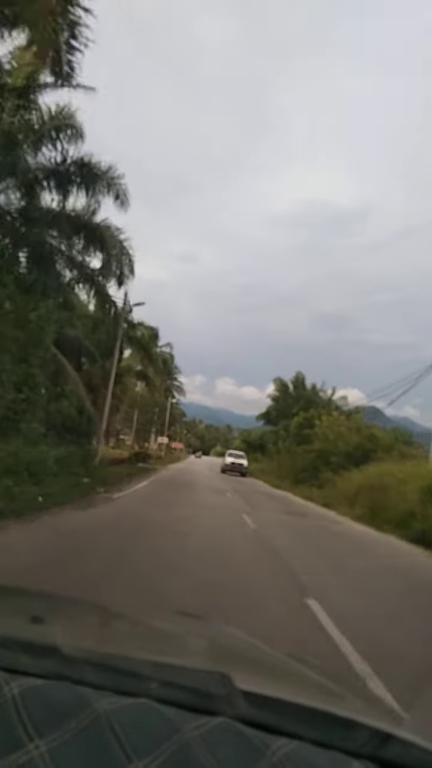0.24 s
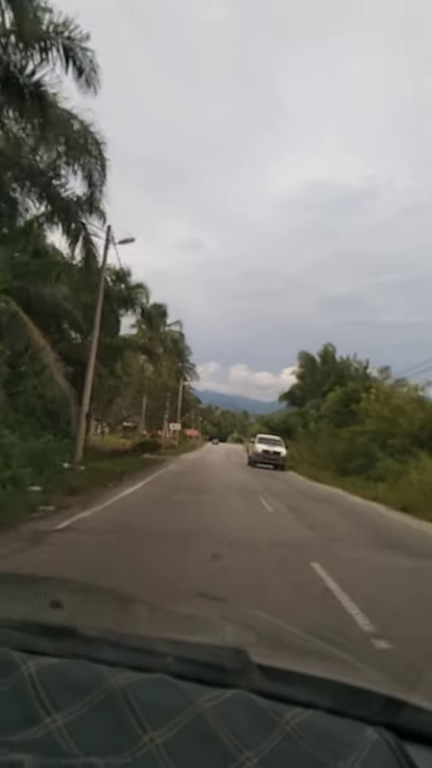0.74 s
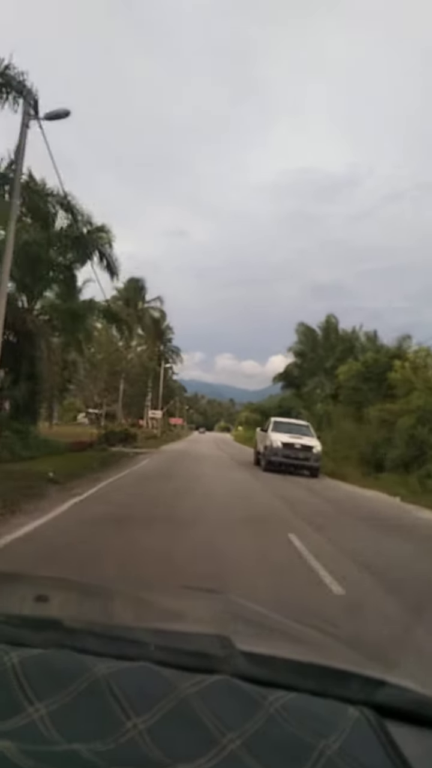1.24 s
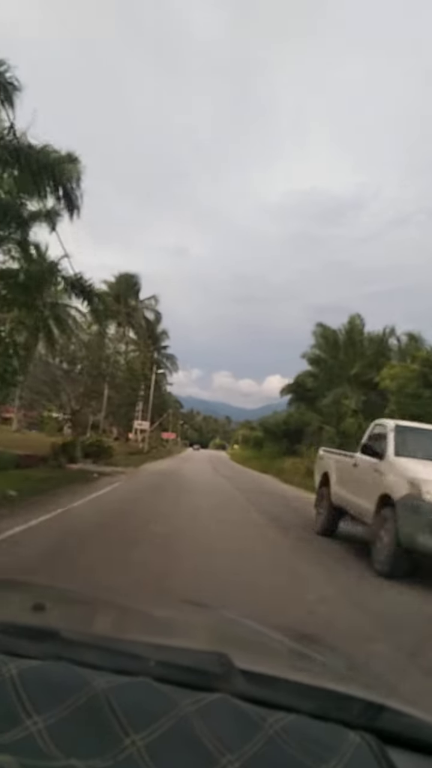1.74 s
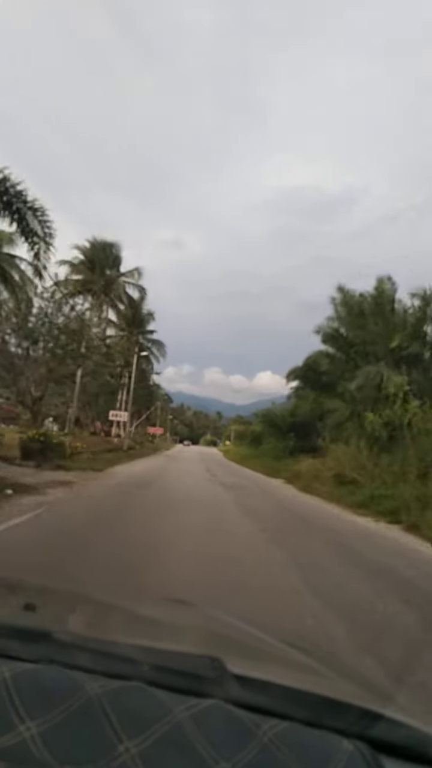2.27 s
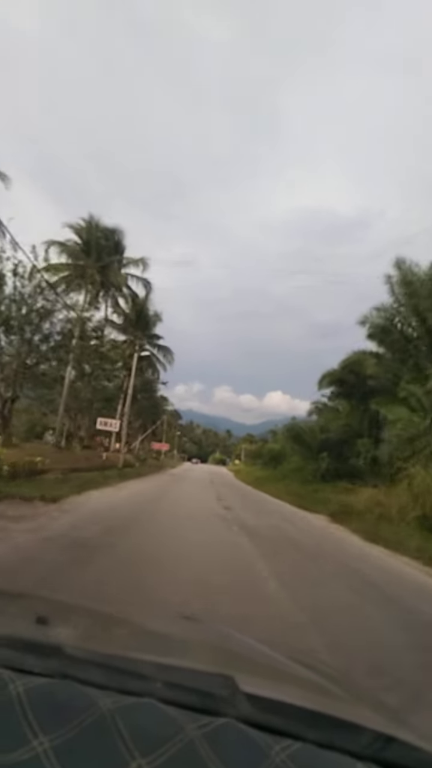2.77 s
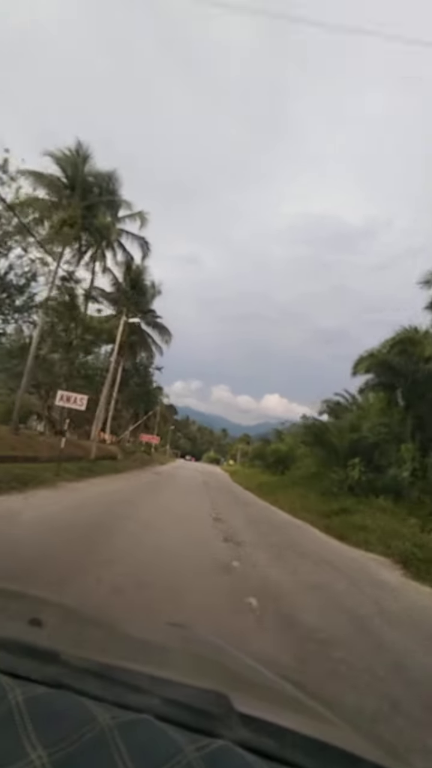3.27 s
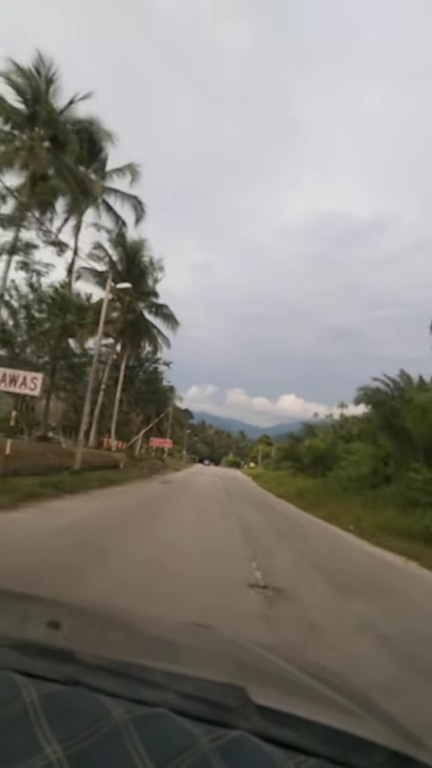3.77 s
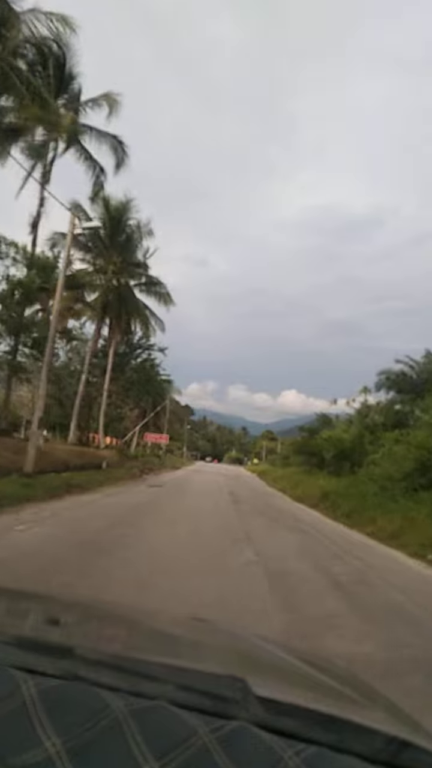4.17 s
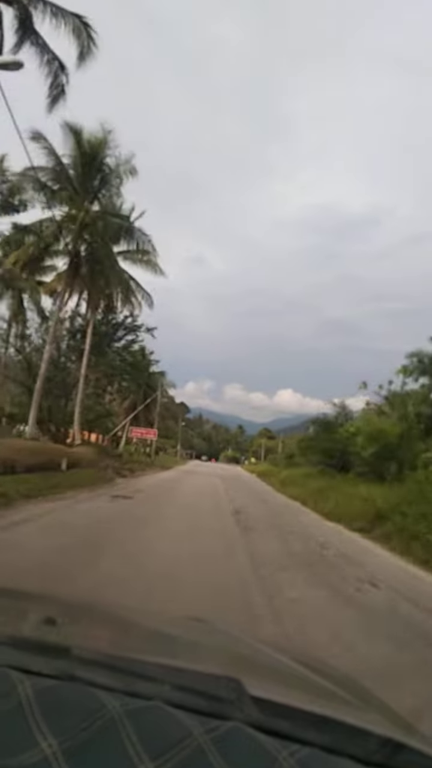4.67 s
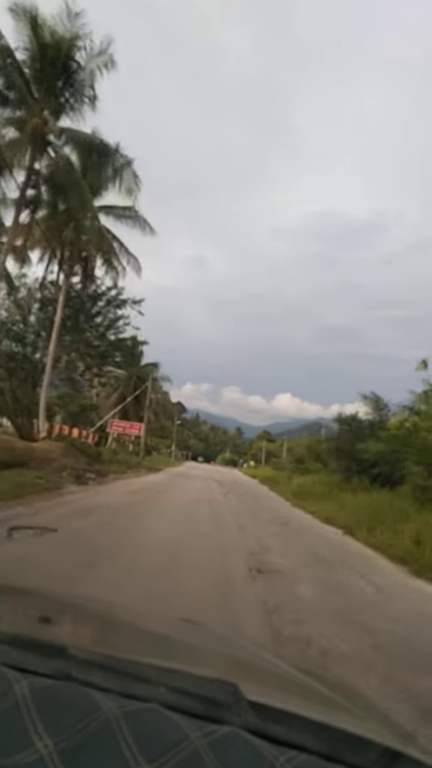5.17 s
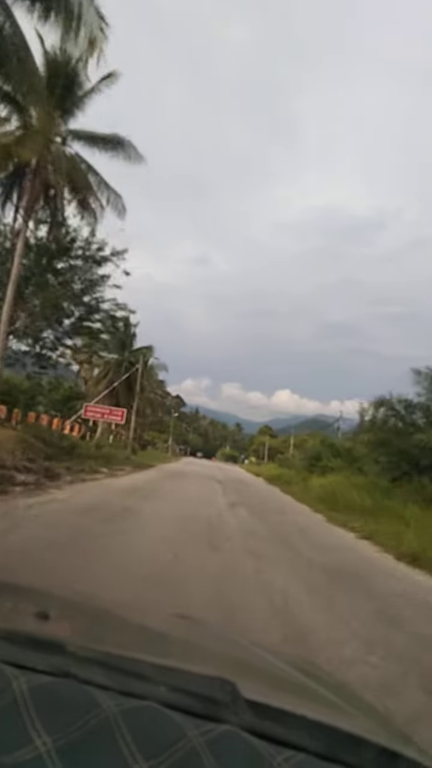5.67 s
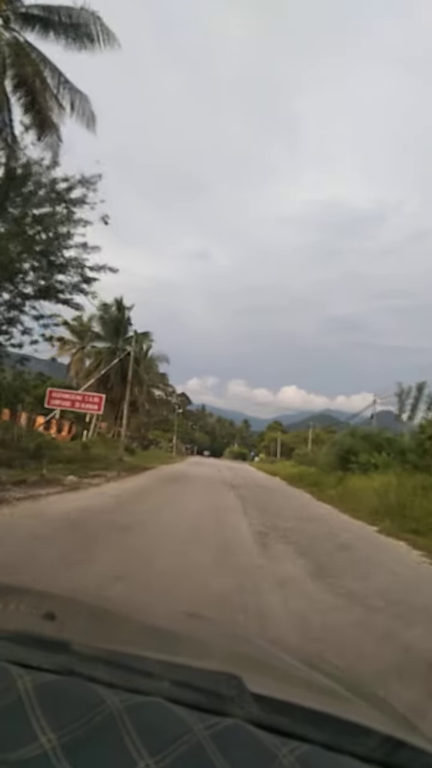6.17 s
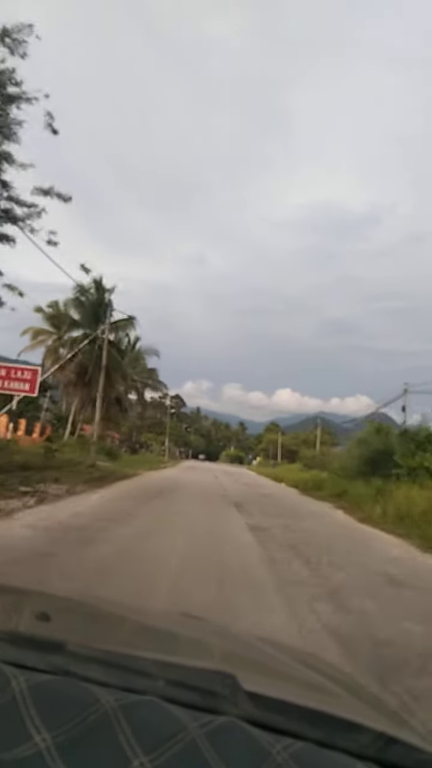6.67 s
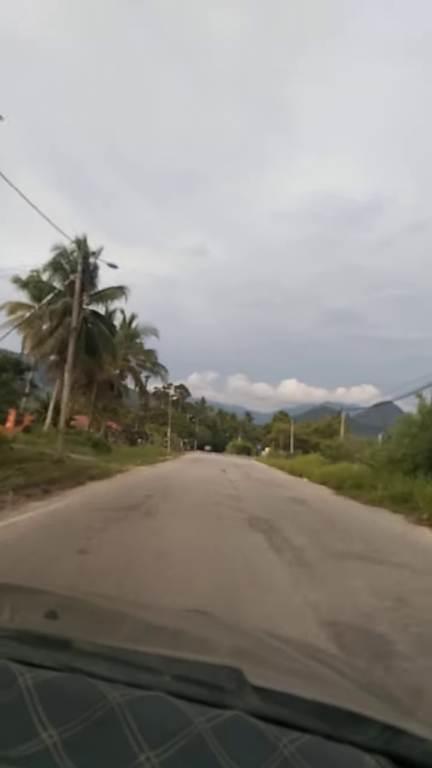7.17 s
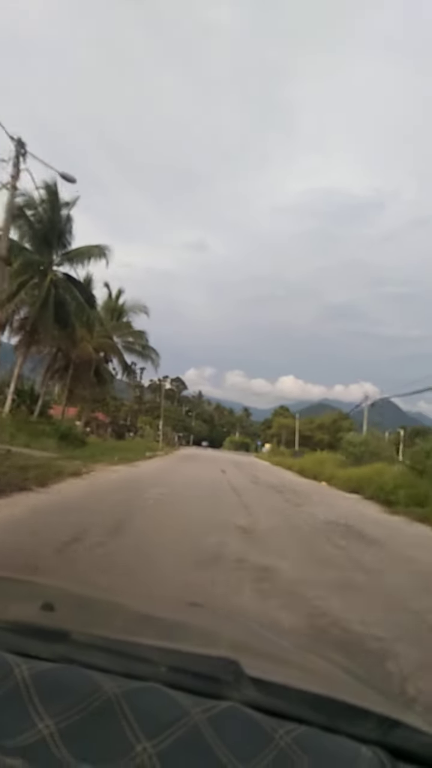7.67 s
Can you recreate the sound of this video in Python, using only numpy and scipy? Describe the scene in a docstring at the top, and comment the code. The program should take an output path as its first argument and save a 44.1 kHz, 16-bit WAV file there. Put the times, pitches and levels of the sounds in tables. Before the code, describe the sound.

Heard in mono behind the windscreen of a small car travelling steadily on a country road. Low tyre rumble fills the cabin throughout, gently throbbing with the wheels, over a faint wavering engine hum near 55 Hz that sinks slightly. Air roars softly and hisses at the window. At about 0.4 s an oncoming car passes with a brief soft swish; at 2.2 s a pickup passes louder, with a short bright slap and broader whoosh. From about 1.7 s the asphalt coarsens and the rumble swells, easing near 3 s and rising unevenly again around 3.5, 4.2 and 7 s. Muffled seam thumps fall at 0.9, 2.3-2.4, 3.0 and 6.7 s. Loose plastic ticks irregularly, strongest around 5.4 s and in a cluster at 5.9-6.1 s, with faint buzzing. A very faint, thin falling squeal swells and fades around 5.5-6.3 s. Rumble continues to 8 s.

```python
"""Tyre rumble fills a small car cruising on a country road, heavier on coarse asphalt, over a low engine hum.
Air hisses at the window, and a car and then a pickup swish past in the other lane.
Loose dashboard trim ticks and buzzes, seams thump softly, and one thin squeal swells and fades.
Noise shaped by spectra and cabin resonances makes tyres, air and traffic; sines make hum, thumps and squeal;
noise bursts and tiny random contacts ring the modes of the trim."""
import sys
import numpy as np
from scipy import signal
from scipy.fft import rfft, irfft, next_fast_len
from scipy.io import wavfile
from scipy.ndimage import uniform_filter1d, map_coordinates

SR = 44100
rng = np.random.default_rng(int(sys.argv[2]) if len(sys.argv) > 2 else 0)


def master(y):
    """Save y as 16-bit WAV."""
    cut = np.clip(np.atleast_2d(y).T, -1, 1)
    pcm = np.round(cut * 32767)  # scale
    wavfile.write(sys.argv[1], SR, pcm.astype(np.int16))


N = 349272

# asphalt under the tyres, relative to ordinary road: start_s [s], coarse_db [dB], uneven_db [dB]
ROAD_SURFACE = [(0, -8, -5.5), (.2, -6, -5.5), (.75, -7.5, -7.5), (1.1, -4.5, -4.5), (1.35, -2.5, -2),
                (1.48, -4, -3.5), (1.7, 1, -2), (1.82, 2.3, 3), (2.04, 3, 5.5), (2.18, 3, 1.5),
                (2.34, 1.5, 4), (2.52, 1, -1), (2.83, -2.7, -5), (3.03, -.5, -1), (3.2, -2.3, -1),
                (3.36, 1.2, 0), (3.52, 1.2, 4.5), (3.8, 1, 1.5), (4.2, 3.7, 3.5), (4.36, 0, -.5),
                (4.6, 1.7, 1), (4.9, 1, 2), (5.3, -.2, 0), (5.6, -.7, -2), (5.8, .2, 1.5), (6.12, .8, -1),
                (6.5, 1.4, -1), (6.7, 1.3, 3.5), (7.05, 1.8, 5), (7.33, 2.8, 1.5), (7.53, .5, -3),
                (7.68, -2.5, .5), (7.9, 0, -2)]
# engine: start_s [s], firing_hz [Hz], hum_db [dB]
ENGINE_COURSE = [(0, 58.5, -35.5), (.6, 58.2, -34), (.74, 58.1, -38), (.98, 57.9, -30), (1.4, 56.9, -39),
                 (2.6, 57.1, -41), (4.15, 55.7, -43), (4.5, 55.4, -33), (5.05, 55, -45), (6.3, 54, -44),
                 (6.65, 53.7, -35.5), (7.3, 53.2, -35.5), (7.7, 52.9, -45)]
# knocks of the loose trim: start_s [s], level_db [dB, before KNOCK_DB], sharp_db [dB],
# chatter_db [dB, relative to the knock]
TRIM_KNOCKS = [(1.11, -55, -3, -7), (1.192, -50, -10, -14), (1.282, -56, -6, -9), (1.302, -50, -12, -8),
               (1.505, -58, -10, -15), (1.666, -60, -12, -15), (1.783, -55, -5, -6), (2.042, -39, -16, -16),
               (2.377, -43, 3, -15), (2.454, -52, 3, -17), (2.736, -53, -4, -12), (2.821, -41, -21, -16),
               (3.111, -46, -11, -19), (3.219, -40.5, -19.5, -16), (3.588, -53, -14, -12),
               (3.988, -39.5, -10, -11), (4.33, -42, -17, -14), (4.346, -41.5, -15, -8),
               (4.783, -53, -12, -14), (4.85, -45, -12, -10), (5.235, -45, -9, -14), (5.374, -54, -10, -14),
               (5.418, -47, -20, -12), (5.444, -33, -16, -11), (5.488, -49, -10, -11),
               (5.897, -45, -10, -12), (5.969, -38.5, -17, -18), (6.009, -48, -14, -16),
               (6.03, -38.5, -16, -17), (6.073, -38.5, -14, -14), (6.093, -42, -13, -12),
               (6.135, -51, -10, -11), (6.397, -52, -22, -14), (6.798, -53, -4, -8), (7.018, -52, -8, -13),
               (7.207, -57, -10, -14), (7.897, -42, -9, -14)]
# cabin and panel resonances: centre_hz [Hz], width_hz [Hz], lift_db [dB]
CABIN_RESONANCES = [(75, 8, -2), (89, 18, 4), (119, 10, 4), (128, 9, -3), (154, 8, -4), (164, 12, 3),
                    (181, 14, 4.5), (194, 8, -2), (207, 14, 5.5), (224, 14, -3.5), (246, 10, -3),
                    (294, 16, -3), (335, 50, 5), (525, 60, 4), (725, 90, 5), (835, 60, -2), (943, 45, 6),
                    (1180, 130, 3), (1540, 40, -4), (1640, 70, 5), (1950, 140, 4), (2320, 110, 4),
                    (4260, 110, 4), (4400, 90, -3), (5030, 150, 3), (5660, 150, -6), (5860, 110, 5)]
# ringing modes of the trim: centre_hz [Hz], width_hz [Hz], level_db [dB, relative]
TRIM_MODES = [(3360, 70, -7), (3680, 110, -5), (4000, 130, -4), (4260, 130, 3), (4580, 170, -1),
              (5040, 220, -2), (5850, 130, -3), (6080, 110, -5), (6430, 140, -7), (6860, 110, -8),
              (7300, 130, -5), (7540, 130, -3), (7780, 130, -2), (8040, 140, -3), (8490, 120, -4),
              (8750, 100, -9), (9550, 120, -12), (10150, 150, -16), (10750, 350, -16), (11800, 600, -20),
              (13200, 1200, -24)]
# road seams under the wheels: start_s [s], peak_db [dB], boom_hz [Hz]
ROAD_SEAMS = [(0.918, -19, 130), (2.32, -15.5, 85), (2.433, -18, 108), (3.025, -18.5, 86), (6.665, -19, 92)]
# leak at the window seal: start_s [s], hiss_db [dB]
SEAL_LEAK = [(0, -65), (.83, -72), (.94, -65), (1.06, -69), (1.5, -67), (2.6, -65), (3.05, -69.5),
             (3.9, -65), (5.1, -64), (6.6, -66.5), (7.6, -71.5)]
# brief swells of the scuffing tread: middle_s [s], level_db [dB], half_s [s]
SCUFF_SWELLS = [(.62, -54, .08), (.95, -57, .035), (1.34, -56, .055), (3.28, -58, .04), (3.62, -57, .04),
                (3.92, -55, .04), (4.37, -53, .06), (4.9, -57, .09), (6.95, -48.5, .03)]
# spells of buzzing trim: middle_s [s], level_db [dB], half_s [s]
BUZZ_SPELLS = [(1.16, -68, .05), (1.34, -62, .06), (1.9, -67, .09), (3.6, -66, .09), (3.92, -69, .12),
               (4.37, -62, .07), (4.92, -66, .13), (5.48, -63, .09), (6.07, -64.5, .13), (6.48, -70, .12)]
# level of the finest fizz: start_s [s], level_db [dB]
FIZZ_COURSE = [(0, -79), (1.5, -76.5), (2.7, -74), (5, -72), (6.5, -72), (7.9, -76.5)]
# one vehicle each: abreast_s [s], gap_m [m], closing_speed [m/s], wheelbase_m [m], swish_db [dB],
# rear_db [dB, rear axle relative to front], whoosh_db [dB], bow_db [dB], slap_db [dB], wake_db [dB]
CAR_PASSING = (.388, 2.3, 28.5, 2.5, -47, -.5, -33.2, -76, -62, -58.5)
PICKUP_PASSING = (2.162, 2.25, 26.5, 3.3, -41.7, -.5, -29.5, -56, -43, -58)

# broad noise spectra, each: pitch_hz [Hz], density_db [dB per Hz, relative]
# tyres, from low to high
BOOM_SPECTRUM = [(15, -31), (30, -27), (40, -16.5), (50, -10.5), (70, -7), (85, -1), (125, -3.5),
                 (150, -12.5)]
RUMBLE_SPECTRUM = [(40, -54.5), (100, -26), (138, -2), (160, 0.5), (205, -2), (235, -9), (330, -22.5)]
DRONE_SPECTRUM = [(30, -52), (130, -22), (245, 2.5), (300, 0), (350, -1), (385, -3.5), (480, -3.5),
                  (620, -11), (750, -11.5), (900, -17.5)]
# air and tread: roar, scuffing, window hiss, fizz
ROAR_SPECTRUM = [(300, -8), (600, 1), (850, -2), (1100, 2), (1450, 1), (1750, -2), (2000, -5), (2150, -21),
                 (2350, -33), (2550, -45), (2900, -55), (4000, -70.5)]
SCUFF_SPECTRUM = [(1800, -29), (2100, -1.5), (2350, -4.5), (2550, -23), (2900, -34), (3600, -46)]
HISS_SPECTRUM = [(2000, -22.5), (3000, -20), (3550, -16), (3950, 6), (4400, 6.5), (5100, 6), (5550, -10.5),
                 (5900, -10), (6400, -28.5)]
FIZZ_SPECTRUM = [(2000, 0), (6000, -2), (9500, -3), (11200, 2), (13000, 0), (15500, -5)]
# traffic: low whoosh, the tread swish of each vehicle, bow wave at the window
WHOOSH_SPECTRUM = [(100, -29), (250, 9.5), (520, 7), (850, 3.5), (1350, 5), (1900, 1.5), (2200, -1),
                   (2600, -20), (3500, -41)]
CAR_SPECTRUM = [(2300, -5), (2700, -9), (3100, -12), (3550, 4), (4200, 2), (5600, -2.5), (6900, -5),
                (7800, -2), (8800, -3.5), (10000, -9.5), (12000, -16.5), (15500, -29)]
PICKUP_SPECTRUM = [(1500, -8), (2500, 1.5), (2900, 2.5), (3400, 4.5), (4500, 0), (5700, -2.5), (6700, -6.5),
                   (7700, -3), (8500, -3), (9600, -12), (12000, -20.5), (15500, -33)]
BOW_SPECTRUM = [(2000, -8), (2600, -2), (3150, 4), (3600, -4), (4250, -1), (5200, -9), (6400, -7),
                (7200, -15), (8100, -7), (9400, -11), (10200, -24)]

# tyre layers: level on ordinary road [dB], gain per dB of unevenness (boom) or coarseness [dB]
BOOM_LAW, RUMBLE_LAW, DRONE_LAW = (-27.3, 1.05), (-26, 1.12), (-31.8, 0.74)
WHEEL_HZ, WHEEL_DRIFT_HZ, THROB_DB = 15.9, .6, 1.1  # turns a second, random drift, depth of the throb
# roar: starting level on ordinary road, slow easing, dB per dB of coarseness
ROAR_DB, ROAR_SAG_DB_PER_S, ROAR_FOLLOWS = -39.9, .19, .15
# scuffing: starting level, easing as the car slows, random swing, dB per dB of leak
SCUFF_DB, SCUFF_SAG_DB_PER_S, SCUFF_SWING_DB, SCUFF_FOLLOWS = -62.3, .5, 3.4, .9
IDLE_BUZZ_DB, BUZZ_FOLLOWS = -83, 1.0  # buzz between spells on ordinary road, dB per dB of coarseness
KNOCK_DB = -3  # added to every knock
CHATTER_PER_S, CHATTER_RISE_S = 330, .0016  # rebounds after a knock: mean rate, rise of each
SQUEAL_S, SQUEAL_HALF_S, SQUEAL_DB = 5.88, .4, -68.5  # middle, half-length, level
SQUEAL_HZ, SQUEAL_SAG_HZ_PER_S, SQUEAL_EASE_S = 8120, 780, .55  # pitch and its fall at the middle, easing
SWISH_FALL, WHOOSH_FALL = 2.45, 2.2  # powers of distance
SHIELD_AHEAD_M, SHIELD_BEHIND_M = 5.8, 9.5  # where the window has cut the swish to 1/e
WHOOSH_LEAD_S = .008  # the whoosh runs ahead of the wheels
BOW_LEAD_S, BOW_S = .228, .045  # air pushed ahead of a vehicle: lead, half-length
WAKE_LAG_S, WAKE_S = .23, .095  # stirred air behind a vehicle: delay, half-length
SLAP_S, REAR_SLAP_DB = .021, -8  # slap of air: half-length, tail relative to nose
TOP_HZ = 15700


def amp(db):
    """Decibels to gain."""
    return 10 ** (np.asarray(db) / 20)


def unit(x):
    """Scale to rms 1."""
    return x / np.sqrt(np.mean(x ** 2) + 1e-20)


def curves(rows):
    """One value per sample for each column after the time."""
    s, *cols = np.transpose(rows)
    return [np.interp(np.arange(N) / SR, s, c) for c in cols]


def wobble(rate):
    """A smooth random curve, rate knots a second."""
    knots = rng.standard_normal(int(N * rate / SR) + 4)
    at = np.linspace(0, N * rate / SR, num=20000)
    return np.interp(np.arange(N) * rate / SR, at, map_coordinates(knots, [at]))


def swells(rows):
    """Summed gain of bell-shaped swells, each (middle_s, level_db, half_s)."""
    t = np.arange(N) / SR
    return sum(amp(db) / np.cosh(np.clip(1.5 * (t - s) / half, -30, 30)) for s, db, half in rows)


def filtered(x, response):
    """x times a complex response of frequency."""
    size = next_fast_len(len(x) + SR // 2)
    return irfft(rfft(x, size) * response(np.fft.rfftfreq(size, 1 / SR)), size)[:len(x)]


def cabin_noise(spectrum):
    """Noise of rms 1 with a broad spectrum, steeply closed above, coloured by the cabin's resonances."""
    f, db = np.transpose(spectrum)
    grid = np.geomspace(5, SR / 2, num=3000)
    lift = sum(gain / (1 + (2 * (grid - centre) / width) ** 2) for centre, width, gain in CABIN_RESONANCES)
    closing = -60 * np.maximum(np.log2(grid / f[-1]), 0)  # 60 dB an octave
    colour = amp(np.interp(np.log(grid), np.log(f), db) + lift + closing)
    return unit(filtered(rng.standard_normal(N), lambda hz: np.interp(hz, grid, colour)))


def patchy(x, depth_db, width_hz=170, life=.07):
    """Let the colour flicker: small patches of time and frequency get their own gain."""
    hz, t, z = signal.stft(x, SR, nperseg=1024)
    where = np.array(np.meshgrid(hz / width_hz, t / life, indexing="ij"))
    field = map_coordinates(rng.standard_normal(size=(400, 400)), where, mode="mirror")
    y = signal.istft(z * amp(depth_db * np.clip(field, -2, 2)), SR, nperseg=1024)[1][:N]
    return y * np.std(x) / np.std(y)


def even(x):
    """Keep the fast flutter of a noise but hold its slow level steady."""
    return x / np.sqrt(np.abs(uniform_filter1d(x ** 2, size=SR // 4)) + 1e-9)


def squeal():
    """A thin high note that catches and lets go, its pitch sinking ever more slowly."""
    since = np.arange(N) / SR - SQUEAL_S
    sag = np.expm1(-np.clip(since, -1, 1) / SQUEAL_EASE_S)
    pitch_hz = SQUEAL_HZ + SQUEAL_SAG_HZ_PER_S * SQUEAL_EASE_S * sag
    jitter_hz = 95 * wobble(500) + 25 * wobble(25)
    phase = 2 * np.pi * np.cumsum(pitch_hz + jitter_hz) / SR
    swell = np.exp(-(since / SQUEAL_HALF_S) ** 4)
    catching = unit(np.clip(1 + .55 * wobble(38), .35, 1.6))
    return amp(SQUEAL_DB) * catching * swell * np.sqrt(2) * np.sin(phase)


def shaking():
    """How hard the trim buzzes, as a gain: a floor that follows the coarse road, plus the spells."""
    return amp(IDLE_BUZZ_DB + BUZZ_FOLLOWS * curves(ROAD_SURFACE)[0]) + swells(BUZZ_SPELLS)


def rebounds(size):
    """Envelope of rms 1 of a loose part bouncing softly, at uneven times and with uneven force."""
    hits = (rng.random(size) < CHATTER_PER_S / SR) * rng.uniform(.3, 1, size)
    pole = np.exp(-1 / (CHATTER_RISE_S * SR))
    return unit(signal.lfilter([1], [1, -2 * pole, pole ** 2], hits))


def plastic(force, spread_db):
    """The trim rings briefly in its modes, in a balance that depends on where it is touched."""
    touch_db = spread_db * np.clip(rng.standard_normal(len(TRIM_MODES)), -1.5, 1.5)

    def modes(f):
        """Sum of band-pass resonances with alternating sign."""
        total = 0
        for k, (centre, width, db) in enumerate(TRIM_MODES):
            resonance = 1j * f * width / (centre ** 2 - f * f + 1j * f * width)
            total = total + (-1) ** k * amp(db + touch_db[k]) * resonance
        return total

    size = np.sqrt(np.mean(abs(modes(np.linspace(0, SR / 2, num=2048))) ** 2))
    return filtered(force, modes) / size


def trim_knocks(knock_t60=.028, chatter_t60=.2, split_hz=6500):
    """Each knock is a noise burst of its own sharpness that rings the trim and leaves a short chatter."""
    t = np.arange(SR // 3) / SR
    onset = 1 - np.exp(-t / .0018)
    soft = signal.butter(2, split_hz, fs=SR, output="sos")
    usual_sharp_db = np.mean([row[2] for row in TRIM_KNOCKS])
    knocks = np.zeros(N + SR)
    for s, db, sharp_db, chatter_db in TRIM_KNOCKS:
        contact = rng.standard_normal(len(t))
        dull = signal.sosfiltfilt(soft, contact)
        # a harder contact drives the upper modes more
        contact = dull + amp(sharp_db - usual_sharp_db) * (contact - dull)
        chatter = amp(chatter_db - 60 * t / chatter_t60) * rebounds(len(t))
        shape = onset * (amp(-60 * t / knock_t60) + chatter)
        ring = plastic(shape * contact, spread_db=2.8)
        knocks[round(s * SR):][:len(t)] += amp(db + KNOCK_DB) * ring
    return knocks[:N]


def trim_buzz(contacts_per_s=400):
    """Tiny random contacts over a bed of noise crackle through the trim as it shakes."""
    grains = unit((rng.random(N) < contacts_per_s / SR) * rng.standard_normal(N))
    buzz = unit(grains + .6 * rng.standard_normal(N)) * amp(2.3 * wobble(45))
    buzz = patchy(buzz, depth_db=7, width_hz=110, life=.07)
    return plastic(shaking() * buzz, spread_db=1)


def trim():
    """Knocks and buzz of small light parts, which radiate little below their first mode."""
    small = signal.butter(6, 3200, "highpass", fs=SR, output="sos")
    return signal.sosfilt(small, trim_knocks() + trim_buzz())


def air():
    """A slowly easing roar of air and tread, uneven scuffing, fluttering hiss at the seal and faint fizz."""
    t = np.arange(N) / SR
    hiss_db, = curves(SEAL_LEAK)
    draught_db = hiss_db - hiss_db.mean()

    roar_db = ROAR_DB - ROAR_SAG_DB_PER_S * t + ROAR_FOLLOWS * curves(ROAD_SURFACE)[0]
    roar = amp(roar_db + .9 * wobble(24)) * cabin_noise(ROAR_SPECTRUM)

    scuff_db = SCUFF_DB - SCUFF_SAG_DB_PER_S * t + SCUFF_FOLLOWS * draught_db
    scuff_db = scuff_db + SCUFF_SWING_DB * np.clip(wobble(14), -2, 1.2)
    scuff_gain = amp(scuff_db) + swells(SCUFF_SWELLS)
    scuff = scuff_gain * patchy(cabin_noise(SCUFF_SPECTRUM), depth_db=6.5, width_hz=60, life=.05)

    seal = patchy(cabin_noise(HISS_SPECTRUM), depth_db=6, width_hz=60, life=.05)
    # the seal leaks more while the body shakes
    shake_db = 20 * np.log10(shaking())
    hiss = amp(hiss_db + 0.15 * (shake_db - shake_db.mean()) + 2 * wobble(16)) * seal

    fizz = amp(curves(FIZZ_COURSE)[0]) * patchy(cabin_noise(FIZZ_SPECTRUM), depth_db=2.5)
    return roar + scuff + hiss + fizz


def engine():
    """Only the firing note and its octave get through the bulkhead, wavering in pitch and level."""
    firing_hz, hum_db = curves(ENGINE_COURSE)
    phase = 2 * np.pi * np.cumsum(firing_hz * (1 + .045 * wobble(12))) / SR
    waver = unit(amp(3.2 * wobble(13)))
    return amp(hum_db) * waver * unit(np.sin(phase) + amp(-9) * np.sin(2 * phase))


def oncoming(vehicle, spectrum):
    """Each axle swishes abreast; a lower whoosh bends round and lasts longer; bow wave and wake hiss."""
    s, gap_m, speed, wheelbase_m, swish_db, rear_db, whoosh_db, bow_db, slap_db, wake_db = vehicle
    along_m = speed * (np.arange(N) / SR - s)

    def nearness(at_m, fall):
        """Gain of both axles together by distance, 1 at the strongest."""
        front = (gap_m / np.hypot(gap_m, at_m + wheelbase_m / 2)) ** fall
        rear = (gap_m / np.hypot(gap_m, at_m - wheelbase_m / 2)) ** fall
        gain = np.hypot(front, amp(rear_db) * rear)
        return gain / gain.max()

    tread = patchy(cabin_noise(spectrum), depth_db=2.5, width_hz=150, life=.035)
    grit = unit(amp(1.2 * wobble(160)))
    shield_m = np.where(along_m < 0, SHIELD_AHEAD_M, SHIELD_BEHIND_M)
    window = np.exp(-(along_m / shield_m) ** 4)
    # air slaps as the nose, then the tail, comes abreast
    half_s = wheelbase_m / (2 * speed)
    slap = swells([(s - half_s, slap_db, SLAP_S), (s + half_s, slap_db + REAR_SLAP_DB, SLAP_S)])
    swish = (amp(swish_db) * window * nearness(along_m, SWISH_FALL) + slap) * grit * tread

    whoosh_gain = amp(whoosh_db) * nearness(along_m + speed * WHOOSH_LEAD_S, WHOOSH_FALL)
    whoosh = whoosh_gain * cabin_noise(WHOOSH_SPECTRUM)

    wake_gain = swells([(s + WAKE_LAG_S, wake_db, WAKE_S)]) * amp(2.2 * wobble(22))
    wake = wake_gain * patchy(cabin_noise(HISS_SPECTRUM), depth_db=6, width_hz=110)

    bow_gain = swells([(s - BOW_LEAD_S, bow_db, BOW_S)])
    bow = bow_gain * patchy(cabin_noise(BOW_SPECTRUM), depth_db=5, width_hz=110)
    return bow + swish + whoosh + wake


def bumps(rise_s=.014):
    """A seam gives the suspension one push, and a short low boom builds up in the cabin and dies."""
    t = np.arange(SR // 4) / SR
    shape = (t / rise_s * np.exp(1 - t / rise_s)) ** 2
    out = np.zeros(N + SR)
    for s, db, hz in ROAD_SEAMS:
        out[round(s * SR):][:len(t)] += amp(db) * shape * np.sin(2 * np.pi * hz * t)
    return out[:N]


def tyre_layer(law, spectrum, road_db):
    """Steady cabin noise whose level follows the road."""
    ordinary_db, follows = law
    return amp(ordinary_db + follows * road_db) * even(cabin_noise(spectrum))


def tyres():
    """The road shakes the body, uneven stretches boom; boom and rumble throb as the wheels turn."""
    coarse_db, uneven_db = curves(ROAD_SURFACE)
    wheel_hz = WHEEL_HZ + WHEEL_DRIFT_HZ * wobble(1.4)
    throb = amp(THROB_DB * np.sin(2 * np.pi * np.cumsum(wheel_hz) / SR))
    boom = tyre_layer(BOOM_LAW, BOOM_SPECTRUM, uneven_db)
    rumble = tyre_layer(RUMBLE_LAW, RUMBLE_SPECTRUM, coarse_db)
    drone = tyre_layer(DRONE_LAW, DRONE_SPECTRUM, coarse_db)
    return throb * (boom + rumble) + drone


def scene():
    """Everything as heard behind the windscreen, in one channel."""
    traffic = oncoming(CAR_PASSING, CAR_SPECTRUM) + oncoming(PICKUP_PASSING, PICKUP_SPECTRUM)
    return (squeal() + trim() + air() + engine() + traffic + bumps() + tyres())[None]


def record(dry):
    """A steep low-pass closes the sound above its band limit."""
    steep = signal.cheby1(14, .1, TOP_HZ, fs=SR, output="sos")
    return signal.sosfilt(steep, dry)


dry = scene()
out = record(dry)
master(out)
```